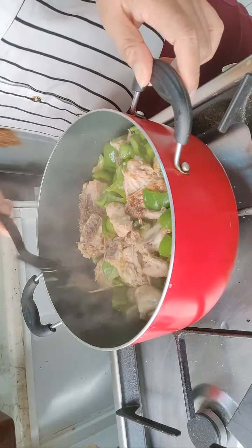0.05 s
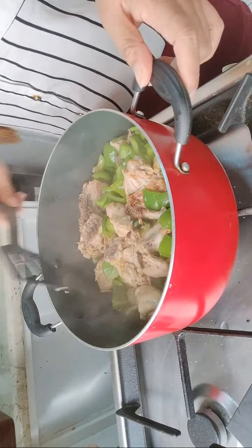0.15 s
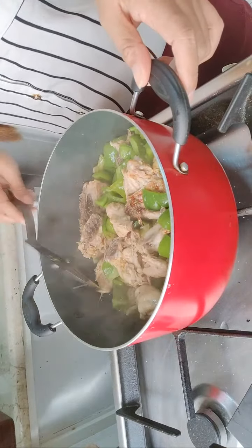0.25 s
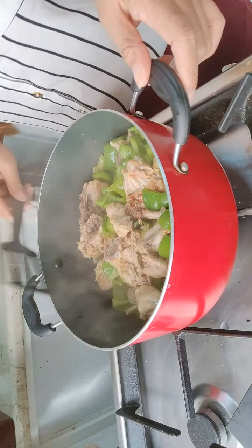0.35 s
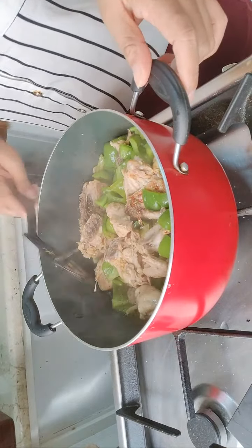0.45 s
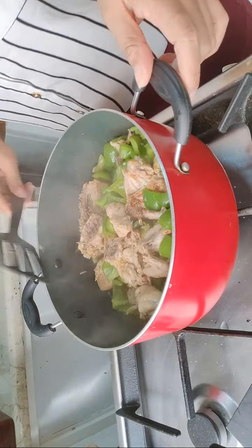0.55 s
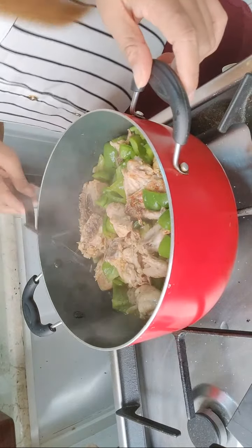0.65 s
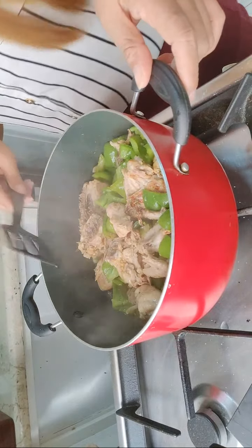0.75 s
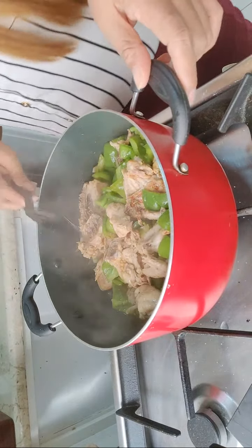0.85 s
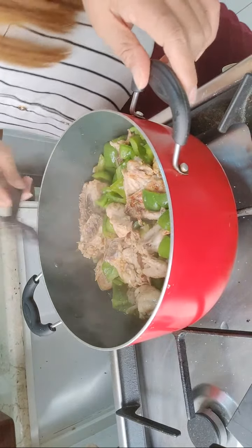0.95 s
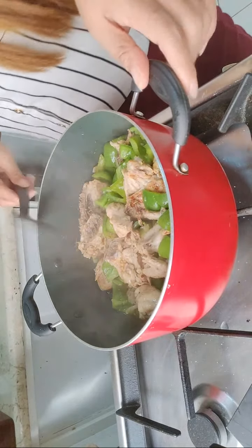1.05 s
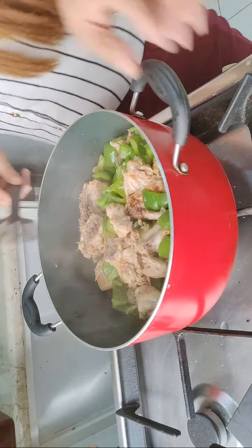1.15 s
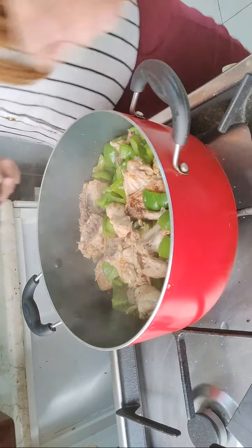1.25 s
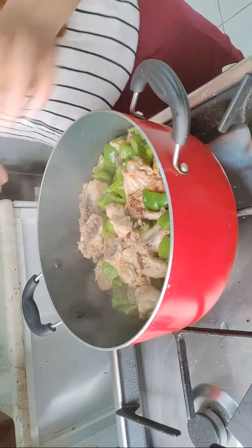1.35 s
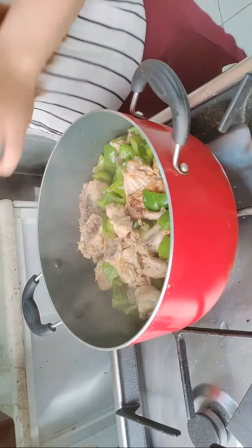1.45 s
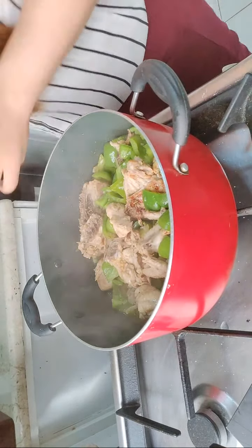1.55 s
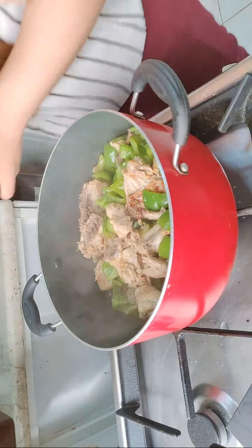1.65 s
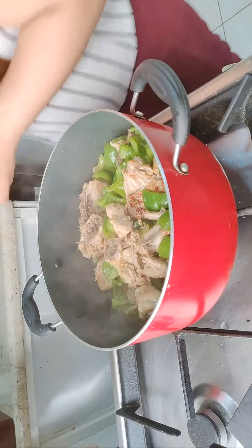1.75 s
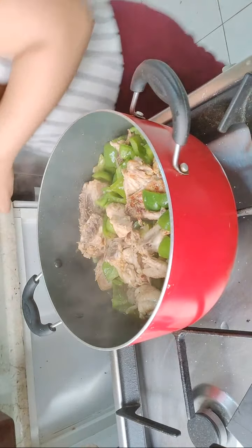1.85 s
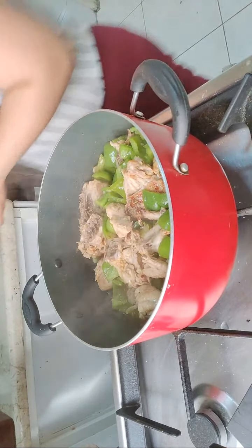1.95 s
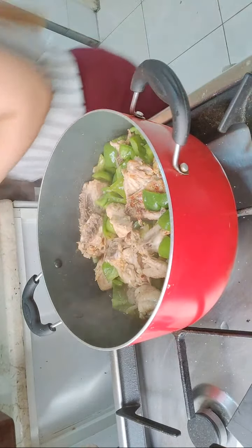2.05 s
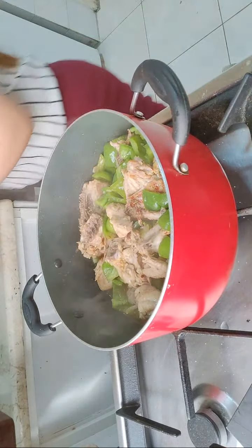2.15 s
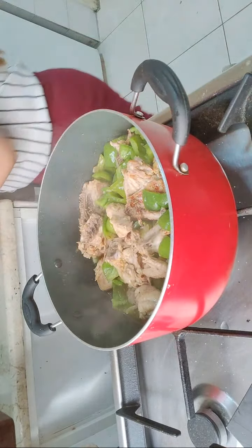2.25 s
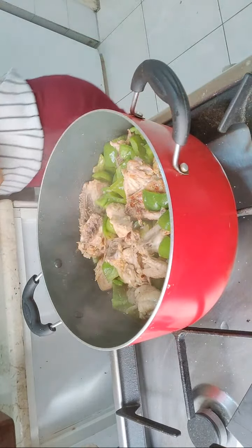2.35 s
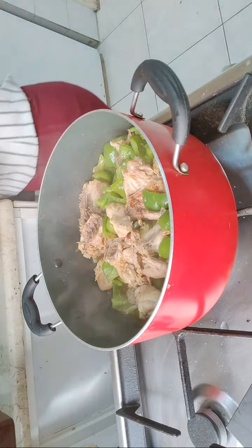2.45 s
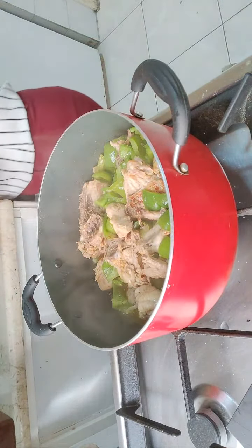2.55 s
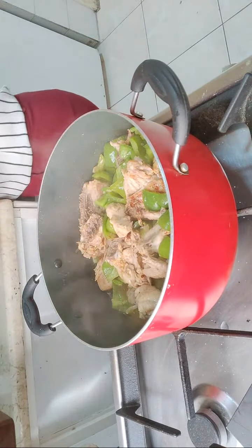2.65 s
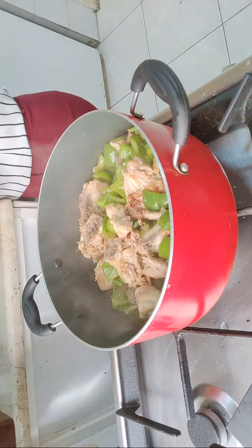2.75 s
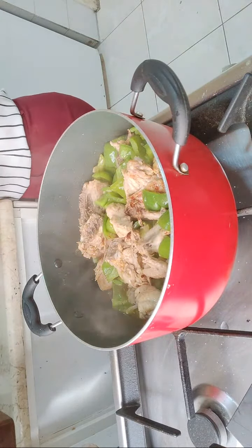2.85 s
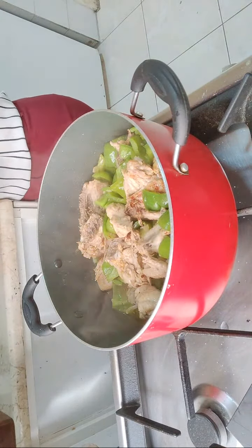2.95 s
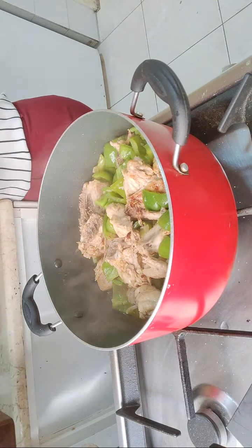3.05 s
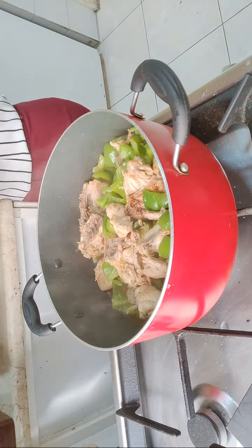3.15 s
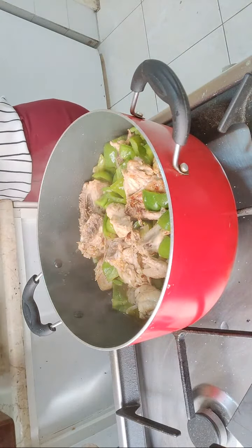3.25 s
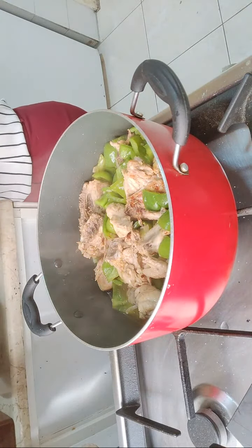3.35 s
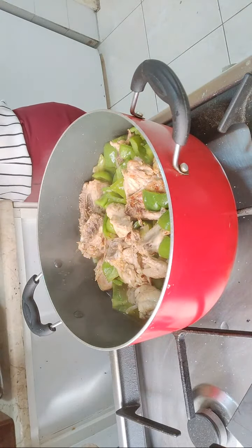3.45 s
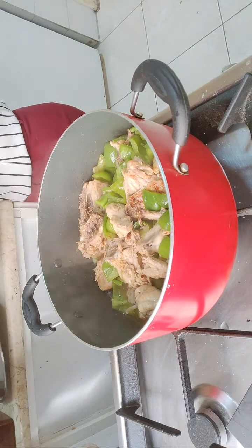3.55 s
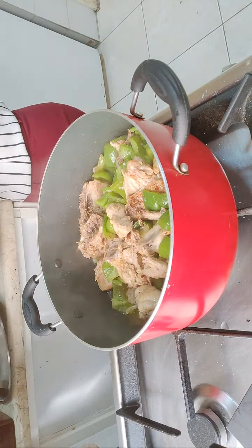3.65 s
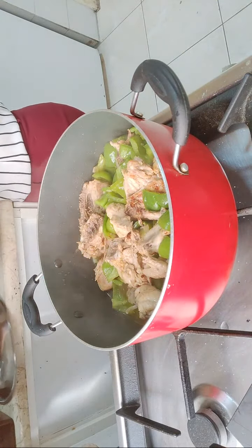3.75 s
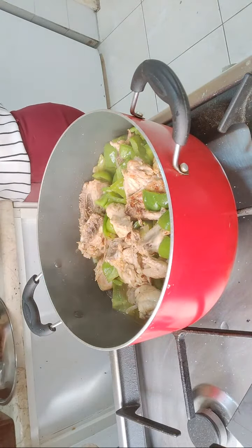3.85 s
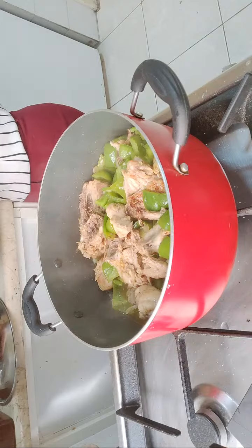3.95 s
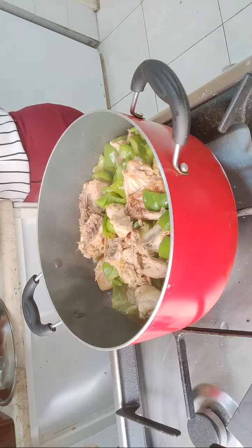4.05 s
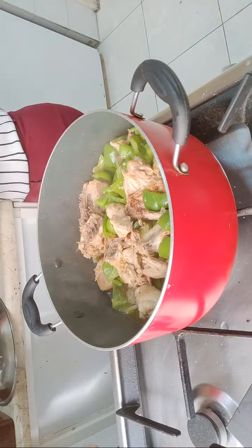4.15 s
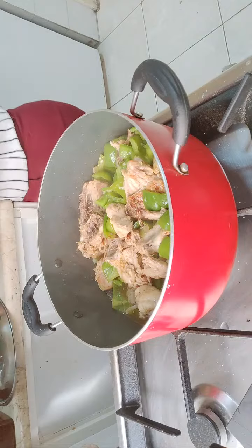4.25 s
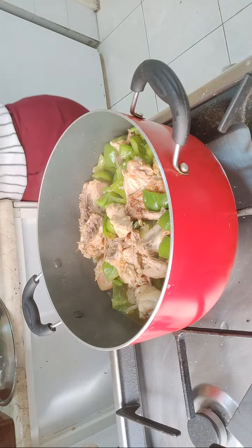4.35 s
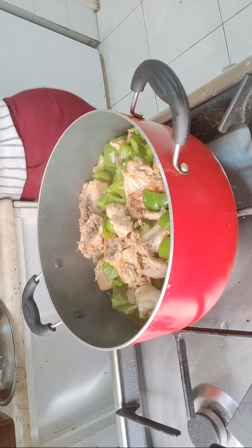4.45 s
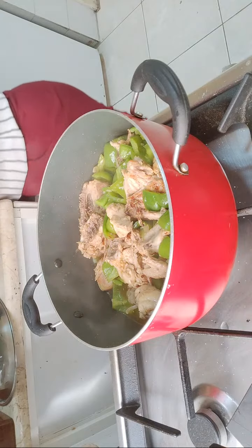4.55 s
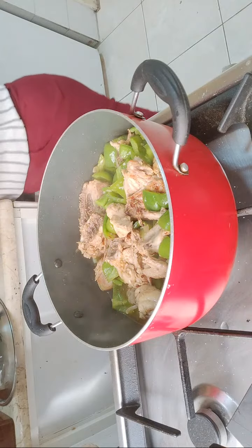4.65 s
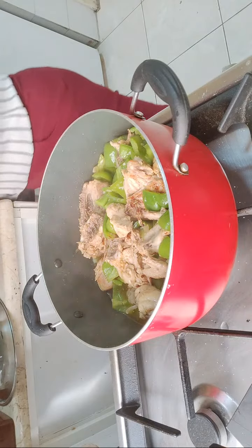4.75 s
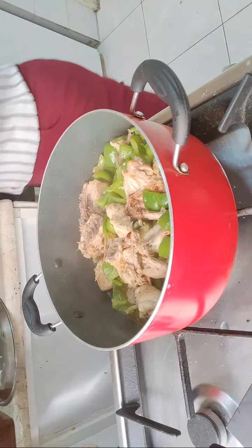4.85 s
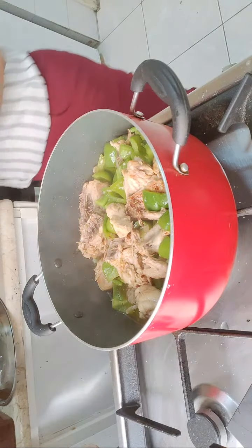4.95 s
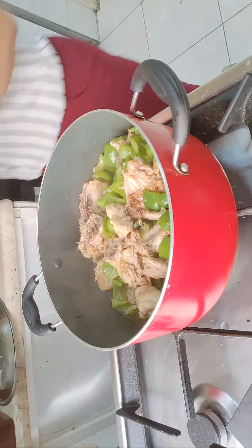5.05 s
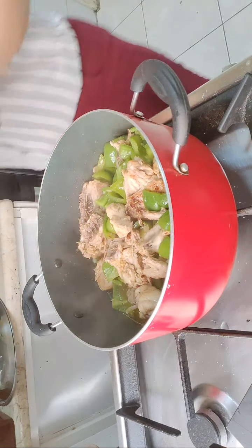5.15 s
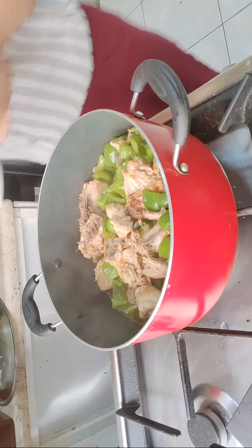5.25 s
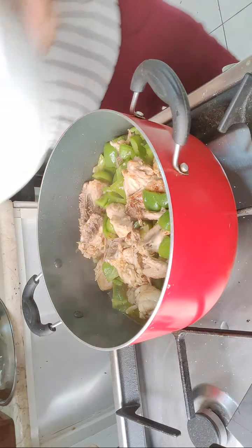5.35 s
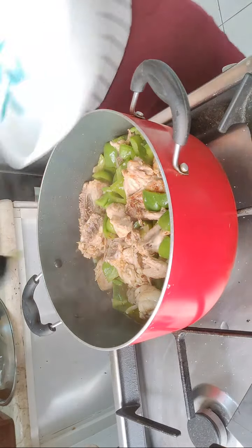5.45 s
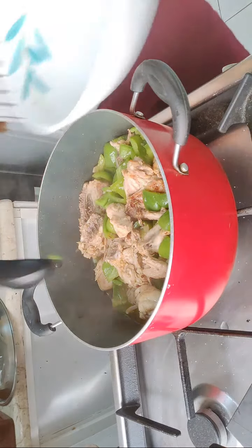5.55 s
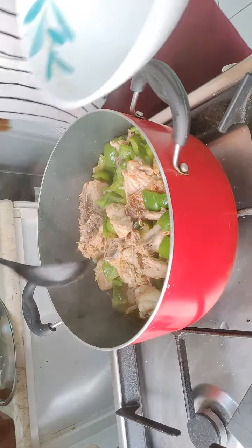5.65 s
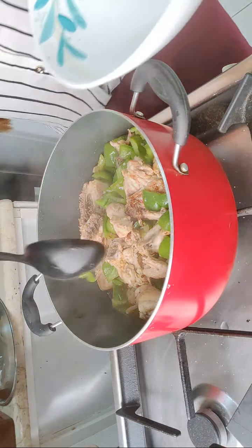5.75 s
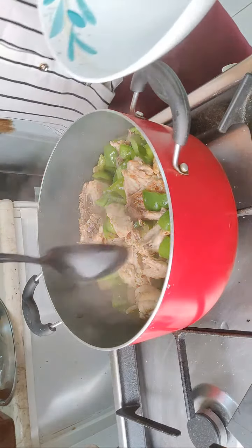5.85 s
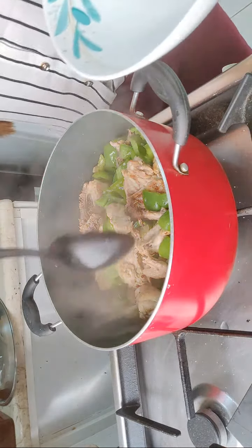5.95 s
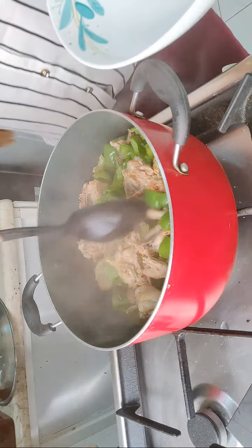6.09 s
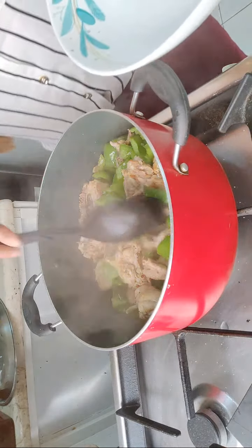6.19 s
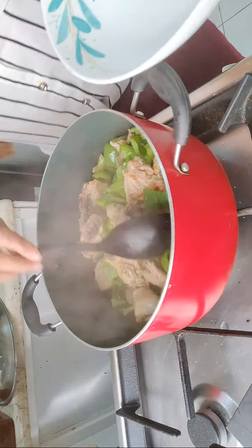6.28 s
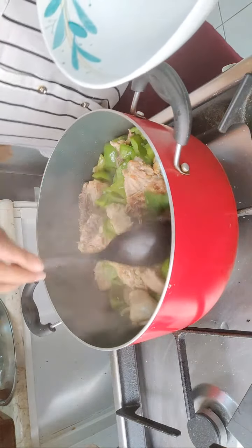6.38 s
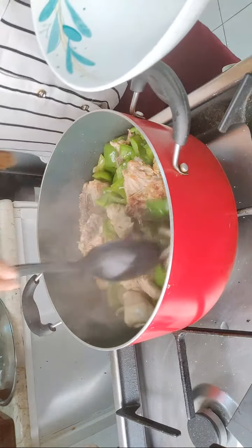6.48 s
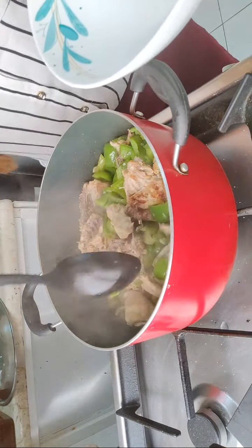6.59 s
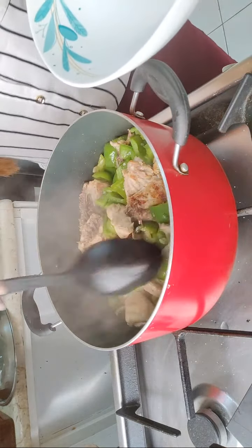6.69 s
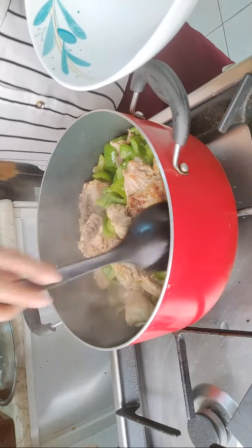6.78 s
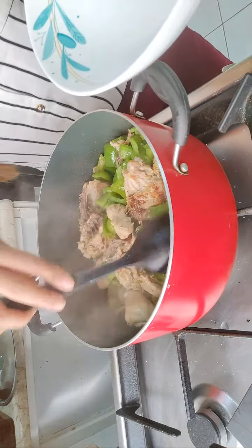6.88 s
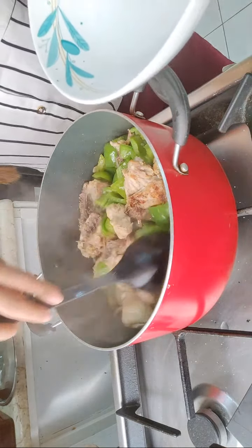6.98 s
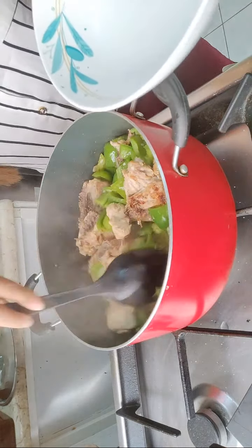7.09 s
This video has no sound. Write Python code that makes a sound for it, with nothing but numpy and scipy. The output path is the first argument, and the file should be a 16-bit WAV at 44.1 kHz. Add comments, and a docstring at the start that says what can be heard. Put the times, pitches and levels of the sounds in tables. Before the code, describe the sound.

A utensil raps a metal pot rim five times, clangs into a steel sink, then a spoon stirs the softly sizzling food.

```python
"""A spatula is knocked clean on the rim of an aluminium pot five times, then clangs into a steel sink.
Chattering contacts excite its short rings, the modes of the pot and those of the basin.
Cutlery clinks as damped ticks; a spoon bumps the pot and turns the food in soft swells of noise.
Meat and peppers sizzle as random pops over hiss, on a gas flame of coloured noise.
The small tiled kitchen answers the blows with a tail of decaying noise bands."""
import sys
import numpy as np
from scipy import signal
from scipy.fft import rfft, irfft, next_fast_len
from scipy.io import wavfile

SR = 44100
rng = np.random.default_rng(int(sys.argv[2]) if len(sys.argv) > 2 else 0)


def unload_audio(sound):
    """Save the sound as a 16-bit wav file, at the path given as the first command line argument."""
    columns = np.transpose(np.atleast_2d(sound))
    # keep every value between -1 and 1, then stretch to whole-number steps
    steps = np.round(np.clip(columns, -1, 1) * 32767)
    wavfile.write(sys.argv[1], SR, steps.astype(np.int16))


N = 314059
T = np.arange(SR) / SR   # one second: the life of a blow

# decay of the tiled kitchen: f/Hz, t60/s
ROOM_DECAY = [(100, 0.64), (500, 0.54), (2000, 0.46), (5000, 0.6), (8000, 0.31), (15000, 0.28)]
CUTOFF_HZ = 15900

# gas flame, relative spectrum: f/Hz, level/dB per Hz
FLAME_COLOUR = [(20, -28), (40, -28), (50, -8.5), (80, -17), (110, -3), (155, -8.5), (230, -4),
                (400, -14.5), (600, -19), (800, -16), (1100, -20), (1800, -22.5), (4000, -37.5),
                (8000, -53)]
# sizzling juices, relative spectrum: f/Hz, level/dB per Hz
SIZZLE_COLOUR = [(1000, -23.5), (2500, -7.5), (3600, -7), (4400, -5), (5800, -4.5), (6800, 0.5),
                 (7900, -3.5), (8250, 0.5), (9200, -2), (10500, -9), (12500, -13.5), (16000, -15.5)]
# wavering low hum: f/Hz, level/dB, width/Hz
LOW_HUM = [(95.4, -69, 2.7), (124.3, -61, 4.9)]
# air resonances of the open pot, heard as bands of noise: f/Hz, level/dB, width/Hz
POT_AIR_BANDS = [(484.4, -75.5, 9.4), (541, -85, 15), (702, -77.5, 18), (904, -77.5, 37), (1184, -76.5, 46),
                 (1396, -84, 32), (1870, -78, 67), (7230, -68.5, 930), (8276, -70, 37)]
FLAME_DB, SIZZLE_DB = -58.5, -61   # the stove left alone
# what a blow adds when its upper modes are at 0 dB, and the time constant of the settling power
FLARE_FLAME_DB, FLARE_SIZZLE_DB, SETTLE_S = -55, -56.5, 0.24

# things slide as the cutlery is fetched: middle t/s, half length/s, level/dB, f/Hz, filter width/Hz
SLIDES = [(2.134, .09, -59, 1650, 3580), (2.303, .045, -57.5, 760, 700), (3.06, .135, -57, 980, 500)]
# the hiss with each rub: level against the rub, lag of its middle, half length, pitch, filter width
RUB_HISS_DB, RUB_HISS_LAG_S, RUB_HISS_HALF_S = -0.8, 0.022, .15
RUB_HISS_HZ, RUB_HISS_WIDTH_HZ = 6600, 6000
# the spoon turns the food in even strokes
STIR_S, STROKE_S, STIR_DB, STIR_HZ, STIR_WIDTH_HZ = 6.5, .215, -62.5, 205, 190

# light clinks of cutlery, fetched and then used in the pot:
# t/s, level/dB, body f/Hz, ring f/Hz, relative ringing level/dB, room level/dB
CUTLERY_CLINKS = [(2.672, -24.5, 6200, 7200, -1, 6), (2.746, -18, 6400, 8300, -2, 2.5),
                  (3.0002, -26.5, 950, 6300, 4, 6.5), (6.343, -49.5, 480, 840, 23, -6.5),
                  (6.4496, -14.5, 564, 850, -5, 1), (6.795, -23.5, 2350, 4000, 7.5, -1.5)]
# tick of cutlery: f/Hz, level/dB
TICK_COLOUR = [(200, -4), (1000, -12), (3000, -12), (7500, 1), (11000, -7.5), (16000, -40)]

# modes of the loaded pot: f/Hz, relative level/dB, t60/s
POT_MODES = [(212, -39, .42), (266, -45, .3), (282, -45, .4), (335, -45, .16), (360, -42, .22),
             (473, -54, .3), (555, -47.5, .58), (712, -49, .24), (889, -53, .57), (1102, -56, .35),
             (1160, -53, .42), (1422, -59, .4), (1720, -60, .35), (2089, -63, .45)]
# dull thud of pot and food: f/Hz, level/dB
POT_THUD_COLOUR = [(30, -7), (90, 7.5), (160, 5), (330, 15.5), (480, 2.5), (800, 9.5), (1300, -22.5),
                   (2500, -60), (16000, -54)]
# the spoon bumps into the pot: t/s, level/dB, upper modes against the lowest/dB
SPOON_HITS = [(6.342, -15.5, 4), (6.451, -4, -5.5)]
# a rim tap favours the pot's upper modes, a drop onto the grate its lowest
TAP_SHAKE_DB, TAP_UPPER_DB, DROP_UPPER_DB = -11, 6.5, -2.5

# the spatula lands in the sink, tip first, then flat:
# t/s, level/dB, relative treble level/dB, relative level of the blade's own ring/dB
SINK_LANDINGS = [(3.707, -9, -3.5, 14), (3.849, -4, 10, -8)]
# the blade's own resonances: f/Hz, width/Hz
BLADE_RINGS = [(2700, 67), (7300, 380)]
# the basin's answer to a contact: f/Hz, level/dB
BASIN_COLOUR = [(60, -24), (300, -2.5), (520, 3), (850, 2), (1300, 9.5), (1600, 9), (2800, 11.5),
                (4100, 0.5), (6200, 5), (7400, 12.5), (8500, 13), (10000, 6.5), (12000, -0.5), (16000, -4)]
# clusters of close modes in the basin, which colour every blow: f/Hz, width/Hz, gain (linear)
BASIN_CLUSTERS = [(520, 460, 0.99), (1437, 18, 1.5), (2170, 49, 0.64), (3235, 170, 1.1), (4600, 110, 1.3),
                  (5400, 86, 2.4)]
# strong modes of the steel basin: f/Hz, relative level/dB, t60/s
BASIN_MODES = [(125, -53, 1.2), (212, -54, .6), (545, -41, .45), (1195, -43, .55), (1290, -44, .45),
               (1426, -37, .42), (1814, -43, .4), (1982, -41, .45), (2179, -40, .5), (2622, -41, .48),
               (2646, -42, .4), (2790, -43, .45), (3005, -43, .5), (3278, -43, .54), (3352, -44, .5),
               (4522, -50, .44), (5471, -43, .32), (5529, -46, .32), (6912, -43, .3), (7092, -39, .4),
               (7355, -38, .42), (7458, -38, .45), (8146, -40, .45), (8203, -39, .44), (8308, -39, .4),
               (8379, -38, .38), (8715, -38, .35), (8918, -40, .35), (9455, -40, .3), (9826, -43, .36)]
LANDING_CONTACT_S = 0.052   # nominal t60, as for every contact below
LANDING_GRAZE_S, LANDING_GRAZE_DB = .0045, -14   # it brushes the steel just before each landing
# the tip skids in even hops, each a little stronger
SKID_GAP_S, SKID_DB, SKID_GAIN_DB, SKID_CONTACT_S = 0.021, -14, 0.8, 0.088
# lying flat it clatters; each gap is this many times the last
CLATTER_S, CLATTER_GAP_S, CLATTER_SLOWING = 3.864, .008, 1.55
# hardest touch; change per touch before and after it; contact
CLATTER_DB, CLATTER_BUILD_DB, CLATTER_LOSS_DB, CLATTER_CONTACT_S = 1.5, 2, 3.5, 0.066
# the basin's low swell under the clang
RUMBLE_S, RUMBLE_HALF_S, RUMBLE_DB, RUMBLE_HZ, RUMBLE_WIDTH_HZ = 3.94, .33, -53, 100, 200

# spatula on the rim; the pot tips and drops back onto its grate:
# t/s, force level/dB, extra clack at 1-2 kHz/dB, drops back after/s, drop level/dB
RIM_TAPS = [(0.2417, -2.5, 1, .024, -3), (0.4705, 0.5, -4, .012, -8.5), (0.6782, -1, 0.3, .025, -2),
            (0.8682, 6, -1, 0.023, -8.5), (1.0908, 6, 4, 0.032, -3.5)]
# clack of the spatula on the rim: f/Hz, level/dB
RIM_COLOUR = [(60, -22), (300, -18), (600, -2.5), (1250, 3), (2000, -1), (3000, -5.5), (4400, -4),
              (5300, -11.5), (7400, 0), (9600, -10), (11200, -16), (12500, -30), (16000, -37)]
# the spatula's short rings: f/Hz, relative level/dB, t60/s
SPATULA_RINGS = [(3765, -37, .03), (3850, -35, .035), (3990, -33, .03), (4230, -30, .01), (6400, -35, .012),
                 (6540, -29, .02), (6800, -31, .012), (7180, -36, .018), (8170, -39, .03),
                 (9420, -37, .012)]
TAP_CONTACT_S = 0.024
RETOUCH_DB = -11   # against the drop: the pot touches the spatula again as it drops back


def from_db(db):
    """Decibels to gain."""
    return 10 ** (np.asarray(db) / 20)


def rms_one(x):
    """Scale to rms 1."""
    return x / np.sqrt(np.mean(x ** 2) + 1e-20)


def add(out, s, sound):
    """Mix a sound in at time s."""
    start = int(s * SR)
    out[start:start + len(sound)] += sound[:N - start]


def at_hz(points, hz):
    """Read a table on a log-frequency axis."""
    known_hz, values = np.transpose(points)
    return np.interp(np.log(hz + 1), np.log(known_hz), values)


def colour(x, spectrum):
    """Causal (minimum-phase) filter with the given (Hz, dB) shape."""
    n = 2 * next_fast_len(len(x) // 2 + 2048)
    hz = np.arange(n // 2 + 1) * SR / n
    cepstrum = irfft(np.log(from_db(at_hz(spectrum, hz))))
    # folding the cepstrum forward gives minimum phase
    cepstrum[1:n // 2] *= 2
    cepstrum[n // 2 + 1:] = 0
    return irfft(rfft(x, n) * np.exp(rfft(cepstrum)))[:len(x)]


def resonate(x, hz, width):
    """One resonance, gain 1 on top."""
    r = np.exp(-np.pi * width / SR)
    zeros = np.array([1, 0, -1]) * (1 - r * r) / 2
    poles = [1, -2 * r * np.cos(2 * np.pi * hz / SR), r * r]
    return signal.lfilter(zeros, poles, x + 1e-18)


def fade(t60):
    """Exponential decay, 60 dB down at t60."""
    return np.exp(-np.log(1000) * np.minimum(T / max(t60, 1e-4), 10))


def sine(hz):
    """One second of a mode, in a random phase."""
    return np.sin(2 * np.pi * (hz * T + rng.random()))


def ring(modes):
    """Struck modes, each in a phase of its own."""
    return sum(from_db(db) * fade(t60) * sine(hz) for hz, db, t60 in modes)


def contact(t60):
    """Two hard things chatter: a noise burst of unit energy that builds and dies."""
    burst = rng.standard_normal(SR) * fade(t60)
    # keep only the phases: the spectrum is evened out before the last shaping
    burst = irfft(np.exp(1j * np.angle(rfft(burst))), SR) * fade(2 * t60)
    return rms_one(burst * (1 - fade(t60 / 4))) / np.sqrt(SR)


def friction(s, half_s, db, hz, width):
    """A short swell of noise, passed twice through one resonance and centred on time s."""
    out = np.zeros(N)
    rub = rng.standard_normal(SR)[:int(2 * half_s * SR)]
    rub = resonate(resonate(rub, hz, width), hz, width)
    add(out, s - half_s, from_db(db) * rms_one(rub) * np.hanning(len(rub)))
    return out


def kitchen(x, build_s):
    """Echoes off the tiles thicken into a tail whose bands each die at their own rate."""
    edges, tail = np.geomspace(50, 18000, 10), 0
    for low, high in zip(edges, edges[1:]):
        band_filter = signal.butter(2, [low, high], "band", fs=SR, output="sos")
        band = signal.sosfilt(band_filter, rng.standard_normal(SR))
        tail = tail + band * fade(at_hz(ROOM_DECAY, np.sqrt(low * high)))
    tail = rms_one(tail * (1 - fade(build_s))) / np.sqrt(SR)
    return signal.fftconvolve(x, tail)[:N]


def pot_blows():
    """Taps, drops back onto the grate and spoon bumps, as (s, dB, dB of the upper modes)."""
    taps = [(s, force_db + TAP_SHAKE_DB, TAP_UPPER_DB) for s, force_db, *_ in RIM_TAPS]
    drops = [(s + after_s, drop_db, DROP_UPPER_DB) for s, _, _, after_s, drop_db in RIM_TAPS]
    return taps + drops + list(SPOON_HITS)


def agitation():
    """Each blow on the pot stirs up flame and juices, which then settle; as a power."""
    jolts = np.zeros(N)
    for s, db, upper_db in pot_blows():
        jolts[int(s * SR)] += from_db(db + upper_db) ** 2
    return signal.lfilter([1], [1, -np.exp(-1 / (SETTLE_S * SR))], jolts)


def stove(pops_per_s=5000, pop_spread_db=4.0, hiss_share=0.77):
    """The flame rumbles and hums; countless tiny bursts of juice sizzle inside the pot."""
    flare = np.sqrt(agitation())
    flame_level = np.hypot(from_db(FLAME_DB), from_db(FLARE_FLAME_DB) * flare)
    flame = flame_level * rms_one(colour(rng.standard_normal(N), FLAME_COLOUR))
    tones = np.zeros(N)
    for hz, db, width in list(LOW_HUM) + list(POT_AIR_BANDS):
        # a second of run-up lets each resonance settle
        tone = resonate(rng.standard_normal(N + SR), hz, width)[SR:]
        tones += from_db(db) * rms_one(tone)
    # a few pops are far bigger than the rest
    sizes = from_db(pop_spread_db * np.minimum(rng.exponential(1, N), 4.5)) * rng.choice([-1, 1], N)
    pops = rms_one(sizes * (rng.random(N) < pops_per_s / SR))
    sizzle = rms_one(colour(pops + hiss_share * rng.standard_normal(N), SIZZLE_COLOUR))
    sizzle_level = np.hypot(from_db(SIZZLE_DB), from_db(FLARE_SIZZLE_DB) * flare)
    return flame + tones + sizzle_level * sizzle


def handling(count=3):
    """Things slide with a rub and a hiss; later the spoon shifts the food, stroke by stroke."""
    out = np.zeros(N)
    for s, half_s, db, hz, width in SLIDES:
        out += friction(s, half_s, db, hz, width)
        out += friction(s + RUB_HISS_LAG_S, RUB_HISS_HALF_S, db + RUB_HISS_DB,
                        RUB_HISS_HZ, RUB_HISS_WIDTH_HZ)
    for k in range(count):   # each stroke overlaps the next by half
        out += friction(STIR_S + k * STROKE_S, STROKE_S, STIR_DB, STIR_HZ, STIR_WIDTH_HZ)
    return out


def cutlery(tick_t60=0.022, width_hz=650):
    """Light clinks: a tick and two damped resonances, some heard mostly off the walls."""
    direct, to_walls = np.zeros(N), np.zeros(N)
    for s, db, body_hz, ring_hz, ringing_db, room_db in CUTLERY_CLINKS:
        tick = contact(tick_t60)
        rings = resonate(tick, body_hz, width_hz) + resonate(tick, ring_hz, width_hz)
        clink = from_db(db) * (colour(tick, TICK_COLOUR) + 2 * from_db(ringing_db) * rings)
        add(direct, s, clink)
        add(to_walls, s, from_db(room_db) * clink)
    return direct + kitchen(to_walls, build_s=0.003)


def pot_bumps(thud_t60=0.14, ring_db=4.0, room_db=-11):
    """Each blow, and each drop back onto the grate, thuds and sets the pot ringing."""
    out = np.zeros(N)
    for s, db, upper_db in pot_blows():
        body = from_db(ring_db) * ring(POT_MODES) + colour(contact(thud_t60), POT_THUD_COLOUR)
        add(out, s, colour(body, [(220, db), (900, db + upper_db), (4000, db + upper_db)]))
    return out + from_db(room_db) * kitchen(out, build_s=0.043)


def skid(treble_db=-2.0, blade_db=0.0, count=4):
    """After the first landing the tip hops on: (s, dB, contact s, treble dB, blade dB)."""
    first_s = SINK_LANDINGS[0][0]
    return [(first_s + SKID_GAP_S * (k + 1), SKID_DB + SKID_GAIN_DB * k, SKID_CONTACT_S,
             treble_db, blade_db) for k in range(count)]


def clatter(treble_db=6.5, blade_db=-14, count=6):
    """Touches build up to the third, then weaken and thin out; columns as in skid()."""
    s, touches = CLATTER_S, []
    for k in range(count):
        db = CLATTER_DB - max(CLATTER_BUILD_DB * (2 - k), CLATTER_LOSS_DB * (k - 2))
        touches.append((s, db, CLATTER_CONTACT_S, treble_db, blade_db))
        s += CLATTER_GAP_S * CLATTER_SLOWING ** k
    return touches


def blows_into_modes(blows, pitches_hz, gains, t60):
    """Each blow tops up the dying energy of the modes."""
    energy = signal.lfilter([1], [1, -from_db(-120 / (t60 * SR))], blows)
    return np.sqrt(energy) * sum(gain * sine(hz) for hz, gain in zip(pitches_hz, gains))


def sink_clang(direct_db=-9, room_db=-5.5, ring_db=-2.5, lesser_db=-61, touch_s=0.0072, count=70):
    """The spatula touches, skids and clatters down; the basin's sheet steel rings on."""
    crash, blows = np.zeros(2 * SR), np.zeros(SR)
    first_s = SINK_LANDINGS[0][0] - LANDING_GRAZE_S
    landings = [(s, db, LANDING_CONTACT_S, treble_db, blade_db)
                for s, db, treble_db, blade_db in SINK_LANDINGS]
    grazes = [(s - LANDING_GRAZE_S, db + LANDING_GRAZE_DB, *rest) for s, db, *rest in landings]
    for s, db, t60, treble_db, blade_db in grazes + landings + skid() + clatter():
        hit = colour(contact(t60) * (1 - fade(touch_s)), [(2000, db), (9000, db + treble_db)])
        blade = sum(resonate(hit, hz, width) for hz, width in BLADE_RINGS)
        add(crash, s - first_s, hit + from_db(blade_db) * blade)
        blows[int((s - first_s) * SR)] += from_db(db) ** 2
    crash = colour(crash, BASIN_COLOUR)
    crash = crash + sum(gain * resonate(crash, hz, width) for hz, width, gain in BASIN_CLUSTERS)
    strong = sum(blows_into_modes(blows, [hz], [from_db(db)], t60) for hz, db, t60 in BASIN_MODES)
    # a crowd of lesser modes lies between the strong ones
    pitches = 450 + 10000 * (np.arange(count) + rng.random(count)) / count
    lesser_gains = from_db(lesser_db + at_hz(BASIN_COLOUR, pitches))
    lesser = blows_into_modes(blows, pitches, lesser_gains, t60=0.7)
    out = friction(RUMBLE_S, RUMBLE_HALF_S, RUMBLE_DB, RUMBLE_HZ, RUMBLE_WIDTH_HZ)
    add(out, first_s, from_db(direct_db) * crash)
    add(out, first_s, from_db(room_db) * kitchen(crash, build_s=0.0054))
    add(out, first_s, from_db(ring_db) * strong + lesser)
    return out


def rim_taps(graze_db=-19, graze_s=0.0034, rings_db=4.5, variety_db=2.36, room_db=-6.0):
    """The spatula grazes the rim, then hits it; its rings change with grip and point of contact."""
    out = np.zeros(N)
    hits = [(s, force_db, clack_db) for s, force_db, clack_db, _, _ in RIM_TAPS]
    retouches = [(s + after_s, drop_db + RETOUCH_DB, 0) for s, _, _, after_s, drop_db in RIM_TAPS]
    for s, force_db, clack_db in hits + retouches:
        modes = []
        for hz, db, t60 in SPATULA_RINGS:
            detune, change = rng.standard_normal(2)
            modes.append((hz * (1 + .003 * detune), db + rings_db + variety_db * change, t60))
        blow = colour(contact(TAP_CONTACT_S), RIM_COLOUR) + ring(modes)
        clack = [(300, 0), (1100, clack_db), (1900, clack_db), (4500, 0)]
        blow = from_db(force_db) * colour(blow, clack)
        add(out, s, blow)
        add(out, s - graze_s, from_db(graze_db) * blow)
    return out + from_db(room_db) * kitchen(out, build_s=0.0031)


def scene():
    """Everything as heard from just above the pot."""
    return (stove() + handling() + cutlery() + pot_bumps() + sink_clang() + rim_taps())[None]


def record(dry, low_cut_hz=46):
    """The small microphone loses the deepest bass; the top is cut steeply."""
    bass_cut = signal.butter(2, low_cut_hz, "high", fs=SR, output="sos")
    top_cut = signal.ellip(12, .1, 80, CUTOFF_HZ, fs=SR, output="sos")
    return signal.sosfilt(top_cut, signal.sosfilt(bass_cut, dry))


dry = scene()
out = record(dry)
unload_audio(out)
```